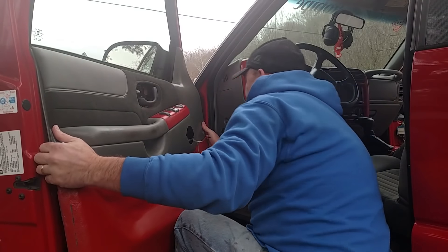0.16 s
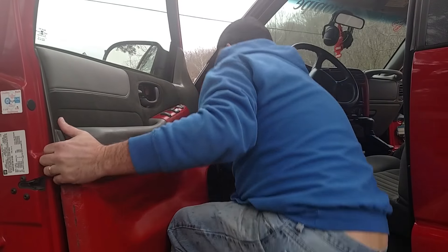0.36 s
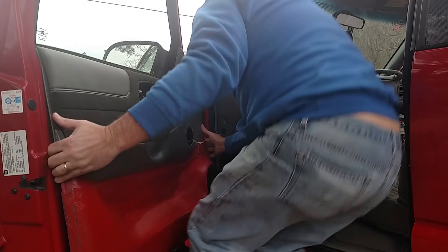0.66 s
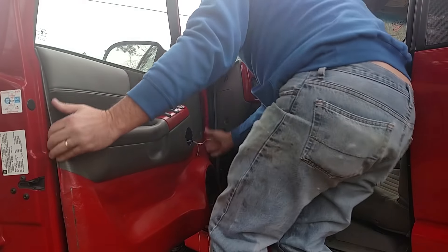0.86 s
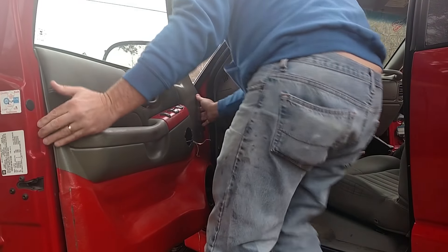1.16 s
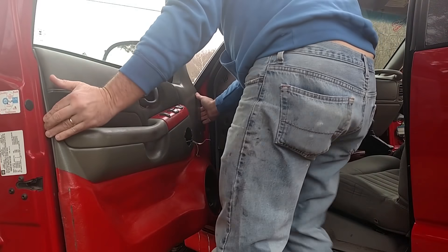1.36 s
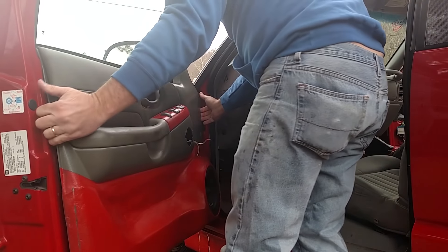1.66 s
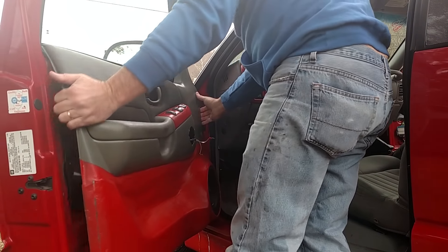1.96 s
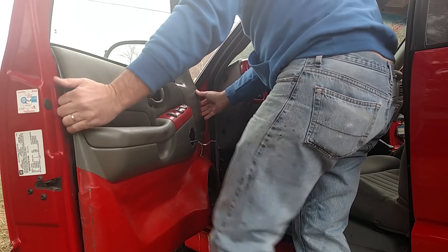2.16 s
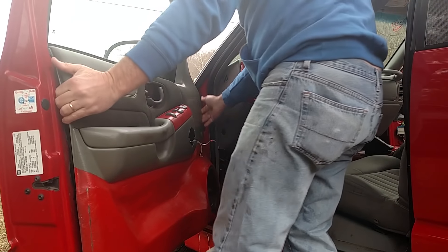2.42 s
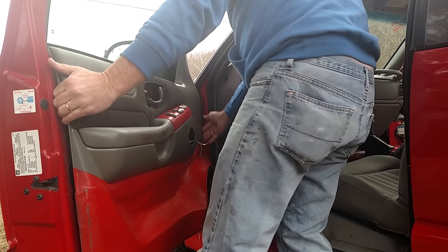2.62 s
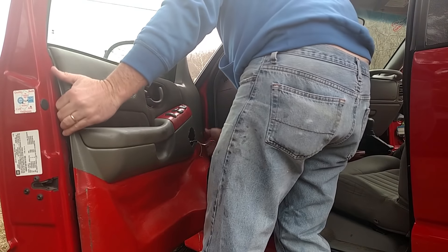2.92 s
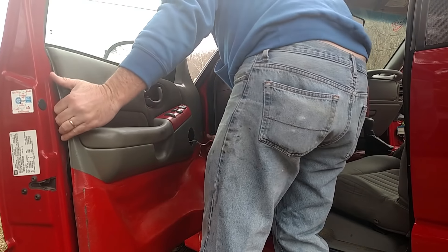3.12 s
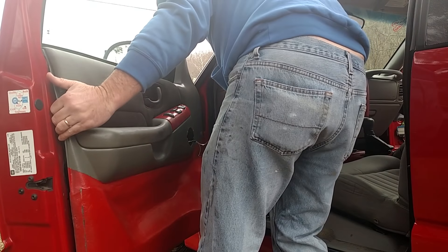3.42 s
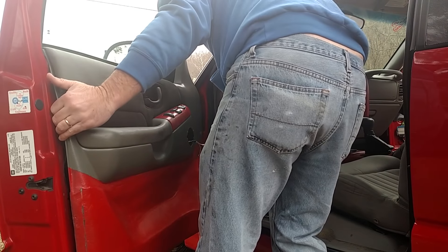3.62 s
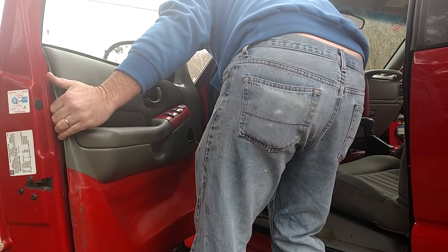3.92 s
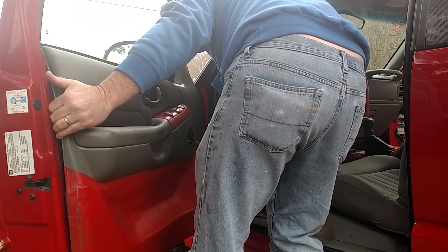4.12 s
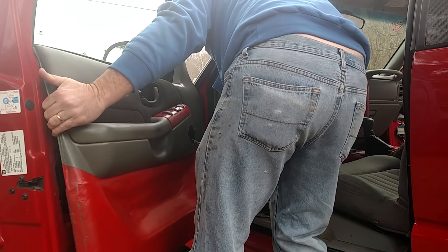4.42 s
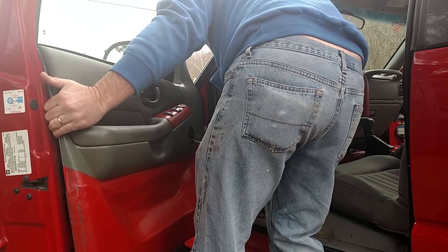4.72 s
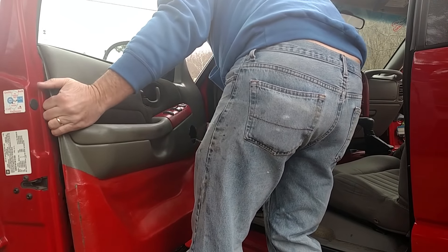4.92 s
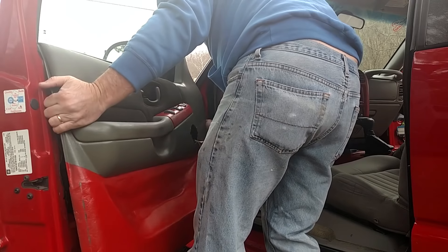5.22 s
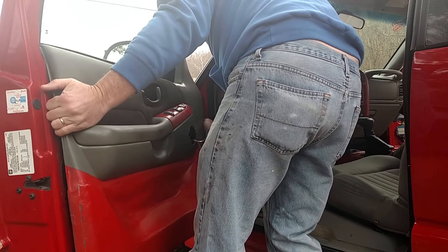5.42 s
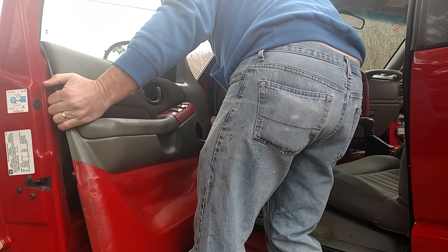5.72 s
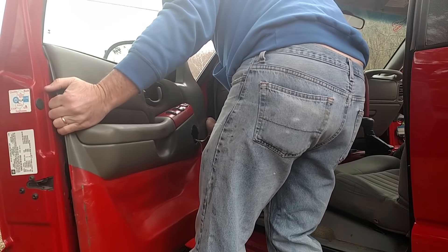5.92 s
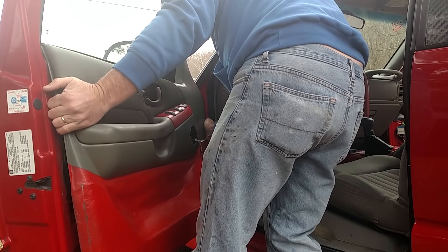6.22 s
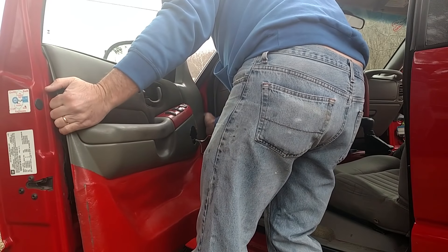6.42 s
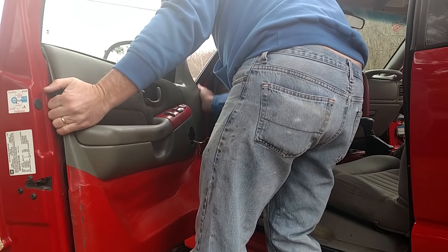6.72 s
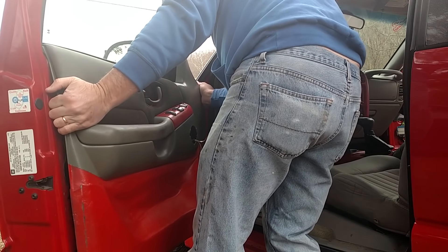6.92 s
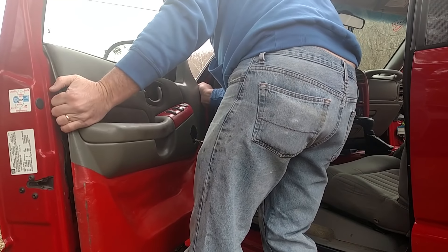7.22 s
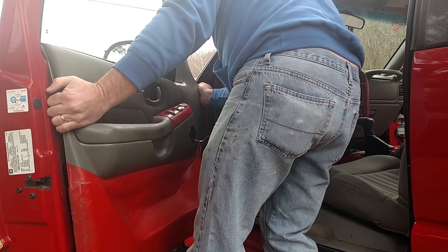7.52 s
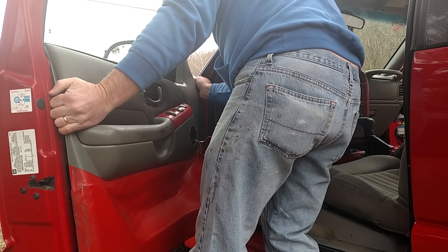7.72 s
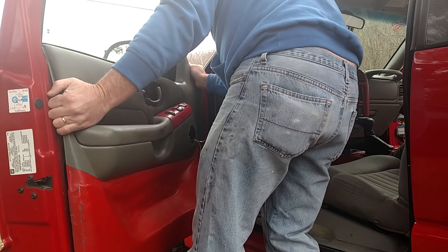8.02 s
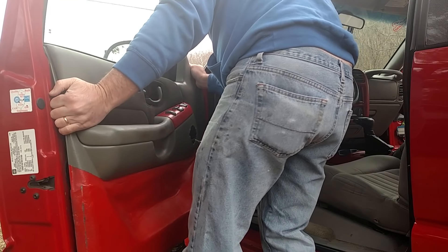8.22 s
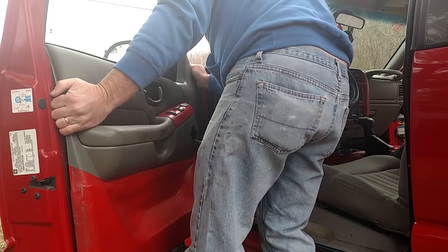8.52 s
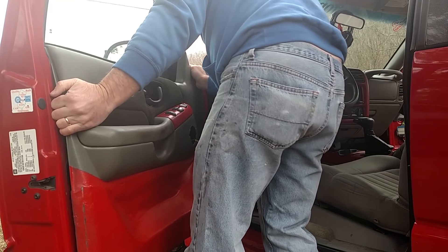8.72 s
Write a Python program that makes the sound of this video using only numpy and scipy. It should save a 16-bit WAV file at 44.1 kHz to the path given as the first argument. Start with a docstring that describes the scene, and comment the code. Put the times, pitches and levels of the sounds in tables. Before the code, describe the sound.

Clips pop loose in uneven bursts of sharp clicks and hollow knocks as a plastic door panel is pulled, creaking softly between tugs.

```python
"""A plastic trim panel is pried off a truck door by two hands, outdoors and close by.
Clips snap free and the panel knocks on the hollow door, exciting its damped modes; short bright
rings and ticks sound, some with the knocks. Between pulls, stick-slip friction makes the panel creak.
Far traffic hums behind, a wall reflects the sharpest snaps, and gain control ducks after them."""
import sys
import numpy as np
from scipy import signal
from scipy.fft import rfft, irfft
from scipy.io import wavfile
from scipy.ndimage import uniform_filter1d

SR = 44100
rng = np.random.default_rng(int(sys.argv[2]) if len(sys.argv) > 2 else 0)


def bounce(signal):
    """Save signal as a 16-bit WAV file at the path given by the first command-line argument."""
    frames = np.transpose(np.atleast_2d(signal))
    limited = np.clip(frames, -1, 1)
    pcm = np.round(limited * 32767).astype(np.int16)
    wavfile.write(sys.argv[1], SR, pcm)


N = 390726


def gain_of(db):
    """Amplitude ratio of a level in dB."""
    return 10 ** (np.asarray(db) / 20)


def unit_rms(x):
    """Normalisation to unit mean power."""
    return x / np.sqrt(np.mean(x ** 2) + 1e-20)


def over_frequency(points, hz):
    """Interpolation on a logarithmic frequency axis."""
    f, value = np.transpose(points)
    return np.interp(np.log(hz + 1), np.log(f + 1), value)


def over_time(rows, column):
    """Linear interpolation of one column at every sample."""
    rows = np.array(rows)
    return np.interp(np.arange(N) / SR, rows[:, 0], rows[:, column])


def add(mix, start_s, sound):
    """Superposition of a sound on the mix."""
    part = mix[round(start_s * SR):][:len(sound)]
    part += sound[:len(part)]


def band(x, low_hz, high_hz):
    """Causal band-pass filtering."""
    return signal.sosfilt(signal.butter(2, [low_hz, high_hz], "band", fs=SR, output="sos"), x)


def minimum_phase(db):
    """Folding the cepstrum gives causal filters with the given magnitudes."""
    cepstrum = irfft(db * np.log(10) / 20)
    half = cepstrum.shape[1] // 2
    cepstrum[:, 1:half] *= 2
    cepstrum[:, half + 1:] = 0
    return np.exp(rfft(cepstrum))


def wavering(hz, width_hz, steady):
    """Random amplitude modulation broadens a tone's spectral line."""
    pole = np.exp(-np.pi * width_hz / SR)
    drift = unit_rms(signal.lfilter([1 - pole], [1, -pole], rng.standard_normal(N)))
    phase = 2 * np.pi * np.cumsum(hz * np.ones(N)) / SR
    return unit_rms((drift + steady) * np.sin(phase))


def traffic():
    """Distant sources superpose: fluctuating broadband noise, an engine drone and a low hum."""
    # noise spectrum: f/Hz, relative density level/dB
    spectrum = [(21, -28.5), (35, -4.5), (60, 1), (141, -4.5), (195, -3.5), (264, -12.5), (430, -13.5),
                (568, -17), (862, -12), (1900, -28), (2130, -28), (4090, -40.5), (9000, -51),
                (11700, -82.5), (19800, -120)]
    # engine drone: t/s, level/dB, f/Hz
    engine = [(0, -35, 68), (.62, -47, 67), (.75, -51, 76), (1.2, -46, 80), (1.8, -47.5, 80),
              (2.6, -48, 75), (3.4, -56.5, 72), (4.6, -55.5, 76), (5.5, -52.5, 75), (7, -61, 78),
              (8.86, -47.5, 76)]
    # hum: f/Hz, level/dB
    low_tone = (50, -54)
    frames, hz = N // 256 + 5, np.fft.rfftfreq(1024, 1 / SR)
    real, imag, patches = rng.standard_normal((frames, 513, 3)).T
    patches = unit_rms(uniform_filter1d(uniform_filter1d(patches, 10, axis=0), 12, axis=1))
    spectra = (real + 1j * imag) * gain_of(over_frequency(spectrum, hz)[:, None] + 1.7 * patches)
    hiss = signal.istft(spectra, nperseg=1024, noverlap=768)[1][:N]
    drone = gain_of(over_time(engine, 1)) * wavering(over_time(engine, 2), width_hz=7.09, steady=1.85)
    hum = gain_of(low_tone[1]) * wavering(low_tone[0], width_hz=11, steady=1.5)
    return gain_of(-48.5) * unit_rms(hiss) + drone + hum


def panel_response(contact_s, t60_scale, hardness, size):
    """Modal response, a row per blow: contact chatter drives low modes; dense ones decay as noise."""
    # modes of the panel on the door shell: f/Hz, relative level/dB, T60/s
    modes = [(110.7, -0.5, 0.39), (127.48, -0.5, 0.23), (147.6, 0, 0.23), (190.7, 3, 0.22),
             (234.3, -2, 0.18), (283.05, -4.5, 0.14), (329, -1.5, 0.11), (375.8, 1, 0.12),
             (410.5, -0.5, 0.12), (477, -3.5, 0.12), (547.4, -4.5, 0.061), (640.01, -5, 0.10318),
             (748, -1, 0.015), (811, -3, 0.066)]
    # decay of the overlapping modes: f/Hz, T60/s
    dense_t60 = [(300, 0.23), (1000, 0.1715), (3000, 0.21), (8000, 0.14), (15000, 0.3)]
    # their spectrum: f/Hz, relative level/dB
    dense_db = [(200, -20.5), (500, -4.5), (1200, -4), (2000, -17), (3000, -25), (7000, -36), (11000, -49),
                (15000, -59)]
    t = np.arange(size) / SR
    hz, db, t60 = np.transpose(modes)
    draws = rng.standard_normal((len(t60_scale), 3 * len(hz) + 2 * size))
    side, place, bend, chatter, hiss = np.split(draws, np.cumsum([len(hz)] * 3 + [size]), axis=1)
    strength = np.sign(side) * gain_of(db + 4.5 * place)  # the point of impact weights the modes
    bent_hz = hz * (1 + 0.044 * bend)  # bending by the pull detunes them
    low = np.array([
        gains @ (gain_of(-60 * t / (scale * t60[:, None])) * np.sin(2 * np.pi * f[:, None] * t))
        for gains, f, scale in zip(strength, bent_hz, t60_scale)])
    rise_s = (0.7 - 0.87 * hardness[:, None]) * contact_s  # soft nudges swell, hard cracks jump
    rise = 1 - np.exp(-t / rise_s)
    chatter = chatter * rise * gain_of(-20 * t / contact_s)
    chatter /= np.linalg.norm(chatter, axis=1, keepdims=True)
    low = signal.fftconvolve(low, chatter, axes=1)[:, :size]
    f, frame_s, spectra = signal.stft(hiss, SR, nperseg=128)
    decay_db = 60 * frame_s / (over_frequency(dense_t60, f)[:, None] * t60_scale[:, None, None])
    spectra *= gain_of(over_frequency(dense_db, f)[:, None] - decay_db)
    dense = signal.istft(spectra, SR, nperseg=128)[1][:, :size]
    crack = 1 + 7.0 * hardness[:, None] * np.exp(-t / 0.008)  # a hard blow is sharpest at its onset
    return low + 3.5 * crack * rise * dense


def creaks(slips_per_s=280):
    """Stick-slip friction: small random slips of plastic on metal excite the panel."""
    # creak under the straining hands: t/s, level/dB
    strain = [(0.0, -45.5), (0.44, -45.5), (0.79, -44.5), (1.48, -50.5), (2.09, -41), (2.39, -52),
              (3.4, -51.5), (3.72, -70), (4.17, -42.5), (4.44, -43), (4.6, -59), (4.86, -47), (5.33, -44),
              (5.9, -60), (6.32, -50.5), (7.48, -46), (8.64, -51), (8.86, -42)]
    strength = gain_of(4.93 * np.minimum(rng.exponential(1, N), 4))
    slips = strength * (rng.random(N) < slips_per_s / SR)
    rings = panel_response(contact_s=0.012, t60_scale=np.full(8, 0.6), hardness=np.zeros(8), size=6000)
    place = rng.integers(0, len(rings), N)
    rustle = sum(signal.oaconvolve(slips * (place == k), ring)[:N] for k, ring in enumerate(rings))
    return gain_of(over_time(strain, 1)) * unit_rms(band(rustle, 85, 1500))


def thump():
    """A dull pressure pulse: rarefaction, then compression, with no resonance."""
    # push of air: t/s, level/dB before windowing, f/Hz
    pulse = (.061, -17, 126)
    start_s, db, hz = pulse
    cycles, out = np.arange(0, 1.3, hz / SR), np.zeros(N)
    add(out, start_s, -gain_of(db) * np.sin(2 * np.pi * cycles) * np.hanning(len(cycles)) ** 0.97)
    return out


def bright_rings(mode_split=0.049, rasp_t60=0.02):
    """Short bright rings and ticks: two close damped modes beat, with a brief rasp around them."""
    # rings and ticks, some sounding with the panel's knocks: t/s, level/dB, f/Hz, T60/s
    ticks = [(0.147, -48, 2926, 0.015), (1.823, -45.5, 6860, 0.045), (1.826, -28, 1630, 0.069),
             (1.874, -23, 1630, 0.047), (1.887, -32.5, 3300, 0.055), (1.889, -55, 8650, 0.0085),
             (4.215, -35, 3360, 0.03445), (4.274, -27, 1990, 0.061), (5.131, -25, 1710, 0.049),
             (5.550, -58, 6700, .03), (6.647, -43, 2460, 0.024), (8.61, -37.5, 1500, 0.02862),
             (8.771, -21, 1620, 0.016)]
    out, t = np.zeros(N), np.arange(4000) / SR
    attack = 1 - np.exp(-t / 0.0027)
    for start_s, db, hz, t60 in ticks:
        noise = band(rng.standard_normal(len(t)), hz / 1.2, hz * 1.2)
        rasp = unit_rms(noise) * gain_of(db + 0.5 - 60 * t / rasp_t60)
        beat = np.cos(np.pi * mode_split * hz * t)
        ring = gain_of(db - 60 * t / t60) * np.sin(2 * np.pi * hz * t) * beat
        add(out, start_s, (ring + rasp) * attack)
    return out


def knocks(soft_snap_db=-81, hard_snap_db=-17.5):
    """Impact excitation: each blow rings panel and door, with its own smooth spectral envelope."""
    # blows: t/s, level/dB of door boom, panel body, knock and snap, T60 factor before limiting
    blows = [(0.341, -40, -52, -51, -96, 0.75), (0.382, -40.5, -54.5, -38, -96, 1.3),
             (0.475, -46, -61, -43, -75.5, 1.1), (0.648, -45, -44, -41.5, -84.5, 0.802),
             (0.671, -47, -45, -46, -76, 2.4), (0.741, -33, -36.5, -35.5, -64, 1.04),
             (0.749, -28, -39, -35.5, -64.5, 1.2), (0.783, -37, -34, -43, -70.5, 1.8),
             (0.828, -43, -45, -48, -60, 1.4), (0.843, -30.5, -49, -40, -67, 0.79),
             (1.824, -21.5, -23, -22, -47.5, 0.421), (1.837, -20, -20.5, -30.5, -60, 0.88),
             (1.872, -22, -18, -22.5, -58, 0.76), (1.886, -20, -18.5, -33, -57.5, 0.4),
             (1.909, -23.5, -36, -41.5, -67.5, 1), (1.947, -36, -42, -37.5, -67, 0.7),
             (2.103, -32, -34, -39, -65, 2.309), (2.135, -36.5, -36, -39, -66, 0.886),
             (2.149, -31, -33, -37, -72, 0.94), (2.172, -26.5, -35.5, -34, -62.5, 1.03),
             (2.179, -37, -26, -40.5, -67, 1.06), (2.191, -25.5, -36, -48, -73, 0.6554),
             (2.233, -35, -47, -46.5, -78.5, 1.2), (2.28, -54, -49, -40.5, -61, 0.7365),
             (3.379, -37, -53, -66, -88, 1.166), (3.951, -27, -20.5, -36, -74, 0.79),
             (4.158, -20, -21.5, -31.5, -62, 1.3), (4.174, -19.5, -17.5, -26.5, -49, 0.83),
             (4.215, -27, -29.5, -33, -61.5, 1.9), (4.233, -25, -28.5, -34, -63, 2.496),
             (4.269, -23.5, -24.5, -34, -52.5, 0.98), (4.304, -26.5, -34, -43, -72, 0.4),
             (4.358, -51, -33.5, -42.5, -72, 1.1), (4.508, -39.5, -40, -43.5, -69, 1.5),
             (4.565, -48, -45.5, -45, -73, 2.252), (4.602, -45.5, -48, -47, -72, 1.299),
             (5.13, -17.5, -18.5, -15, -30, 1.23), (5.327, -38, -32.5, -40, -64, 0.83),
             (5.555, -32, -30.5, -45, -82, 1.1), (5.576, -46, -48, -37, -44, 0.28),
             (5.585, -16.5, -11.5, -15.5, -31, 1.1), (6.412, -53, -42.5, -44.5, -80, 2.451),
             (6.554, -31.5, -38, -43.5, -69, 1.2), (6.647, -22.5, -43.5, -43, -65, 0.83),
             (6.859, -41, -40.5, -44.5, -73, 1.6), (7.027, -39.5, -32, -47.5, -50.5, 0.88),
             (7.157, -65, -36, -39.5, -73, 0.5), (7.241, -51, -30.5, -43.5, -51, 0.96),
             (7.249, -35, -25, -42.5, -49.5, 1), (7.908, -42, -52, -46, -69, 0.82),
             (7.958, -23.5, -42, -46, -73.5, 2.594), (7.999, -23, -27.5, -38, -68, 1.03),
             (8.028, -23.5, -33, -45.5, -71.5, 0.61), (8.048, -26.5, -33.5, -48.5, -62, 0.72),
             (8.247, -41, -42, -60.5, -77, 0.914), (8.376, -35, -44.5, -58, -76, 1.2),
             (8.522, -43, -30, -30, -42.5, 0.79), (8.584, -33, -44.5, -48, -80, 1.3),
             (8.772, -38.5, -28.5, -37.5, -58.5, 0.728)]
    # boom, body, knock, crack, snap and fizz bands: lower f/Hz, upper f/Hz
    bands = np.array([(80, 260), (260, 600), (600, 1400), (1400, 3000), (3000, 6500), (6500, 15000)])
    # weak radiation below the door's lowest mode: f/Hz, filter level/dB relative to the boom band
    bass_loss = (51, -12)
    times, boom, body, knock, snap, t60_scale = np.transpose(blows)
    hardness = np.clip((snap - soft_snap_db) / (hard_snap_db - soft_snap_db), 0, 1)
    struck = panel_response(0.0056, np.clip(t60_scale, 0.2, 2), hardness, size=8192)
    crack = knock + 0.33 * (snap - knock) - 2.5
    fizz = snap - 15 + 13.5 * hardness
    peak_power = [uniform_filter1d(band(struck, *edges) ** 2, 600, axis=1).max(axis=1)
                  for edges in bands]
    lift_db = np.transpose([boom, body, knock, crack, snap, fizz] - 10 * np.log10(peak_power))
    centres, hz = np.sqrt(bands.prod(axis=1)), np.fft.rfftfreq(16384, 1 / SR)
    colour_db = np.array([over_frequency([(bass_loss[0], db[0] + bass_loss[1]), *zip(centres, db)], hz)
                          for db in lift_db])
    coloured = irfft(rfft(struck, 16384) * minimum_phase(colour_db))
    out = np.zeros(N)
    for start_s, blow in zip(times, coloured):
        add(out, start_s, blow[:10000])
    return out


def wall_echo(x, smear_t60=0.12):
    """Reflection from a wall returns the treble once, delayed and smeared."""
    # echo: delay t/s, relative level/dB, lower edge f/Hz
    reflection = (0.07, -20.5, 2880)
    delay_s, db, low_hz = reflection
    echo, t = np.zeros(N), np.arange(2600) / SR
    smear = rng.standard_normal(len(t)) * gain_of(-60 * t / smear_t60)
    add(echo, delay_s, signal.oaconvolve(band(x, low_hz, 9000), smear / np.linalg.norm(smear)))
    return gain_of(db) * echo


def scene():
    """Superposition of near sounds, echo, traffic and microphone self-noise in one channel."""
    near = knocks() + bright_rings() + thump()
    mix = near + wall_echo(near) + creaks() + traffic()
    self_noise = gain_of(-76) * rng.standard_normal(N)
    return (mix + self_noise)[None]


def record(dry):
    """Automatic gain control: gain falls after the hardest snaps and creeps back; band limits follow."""
    threshold_db, attack_s, top_hz = -19.5, 0.044, 15500
    sensed = signal.sosfilt(signal.butter(2, 595, "high", fs=SR, output="sos"), dry[0])
    power_db = 10 * np.log10(abs(uniform_filter1d(sensed ** 2, 200)) + 1e-12)
    fall_db = np.arange(N) * 7.45 / SR  # a held peak sinks 7.45 dB/s
    held_db = np.maximum.accumulate(power_db + fall_db) - fall_db
    over_db = np.maximum(held_db - threshold_db, 0)
    pole = np.exp(-1 / (attack_s * SR))
    ducked = dry / gain_of(0.8 * signal.lfilter([1 - pole], [1, -pole], over_db))
    # the microphone loses the deepest bass
    ducked = signal.sosfilt(signal.butter(3, 40, "high", fs=SR, output="sos"), ducked)
    low_pass = signal.firwin(511, top_hz, window=("kaiser", 9), fs=SR)
    return signal.oaconvolve(ducked, low_pass[None], "same")


dry = scene()
out = record(dry)
bounce(out)
```